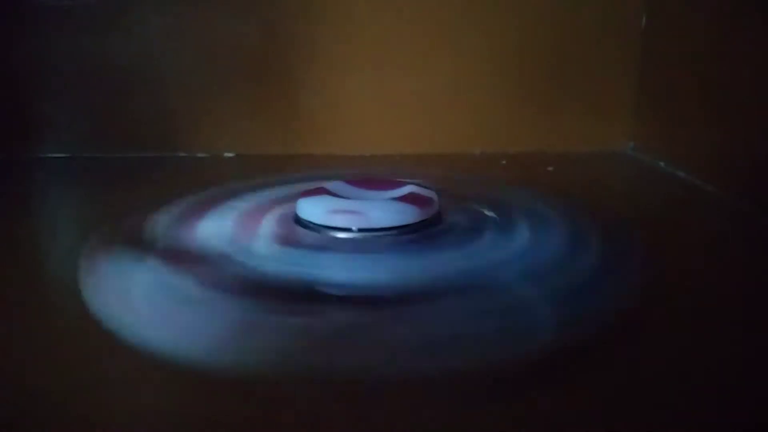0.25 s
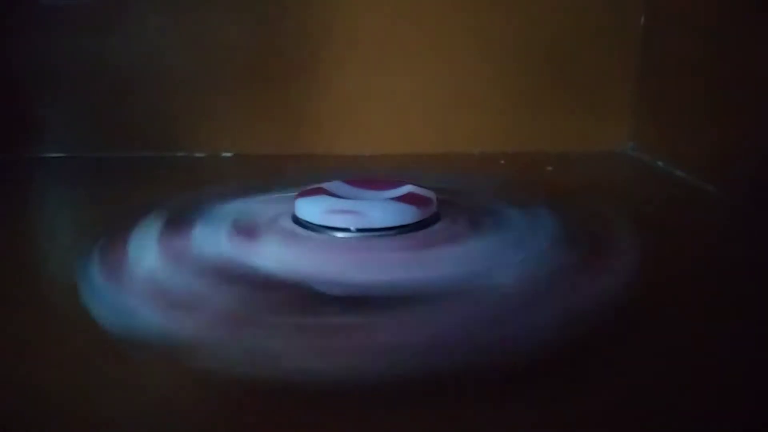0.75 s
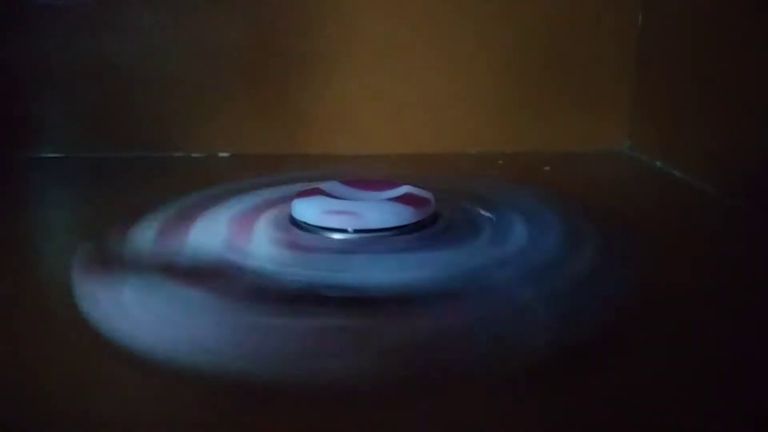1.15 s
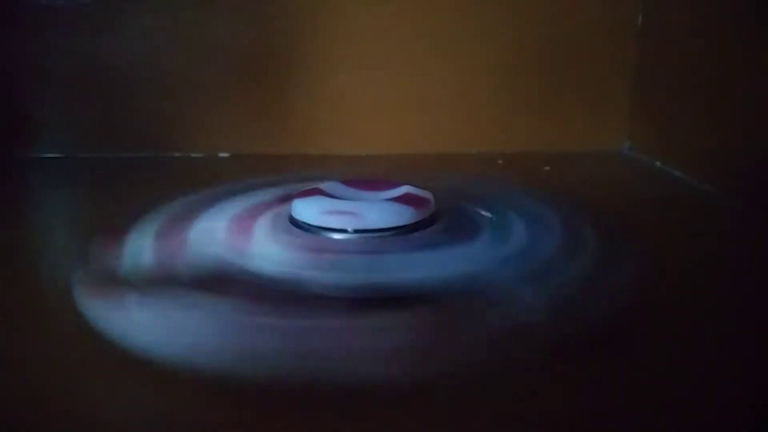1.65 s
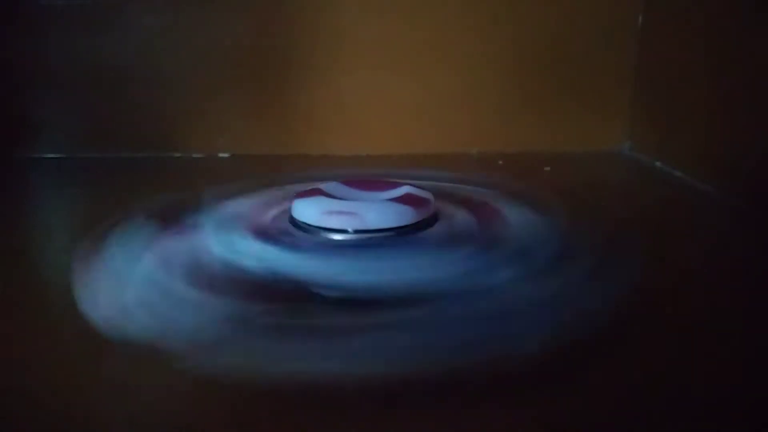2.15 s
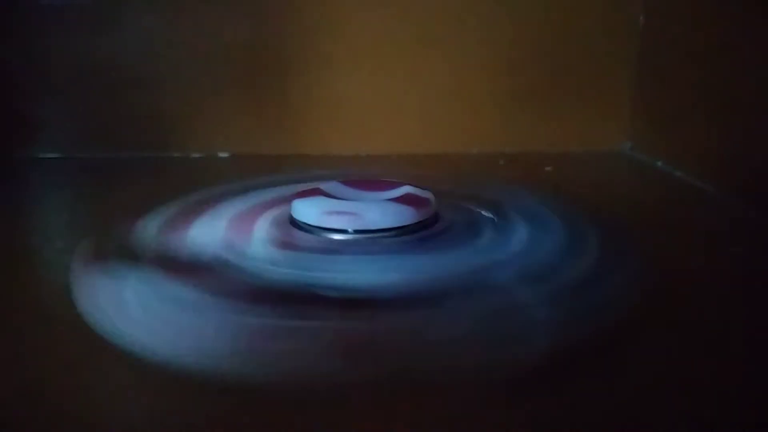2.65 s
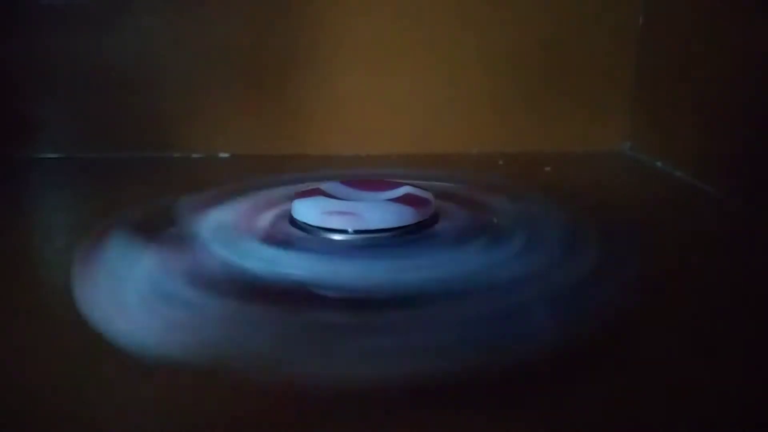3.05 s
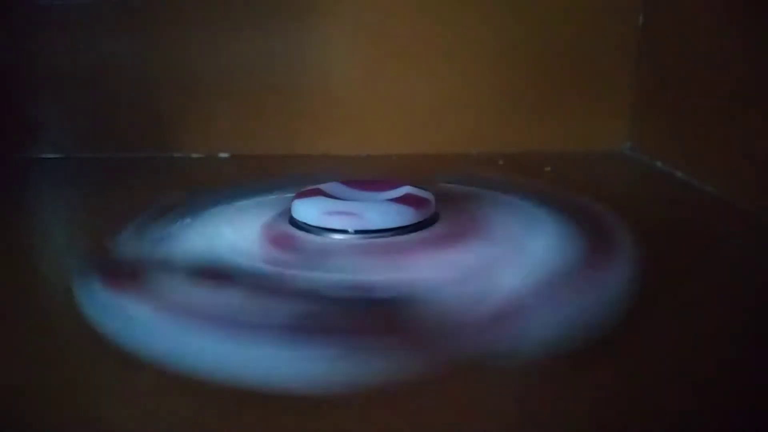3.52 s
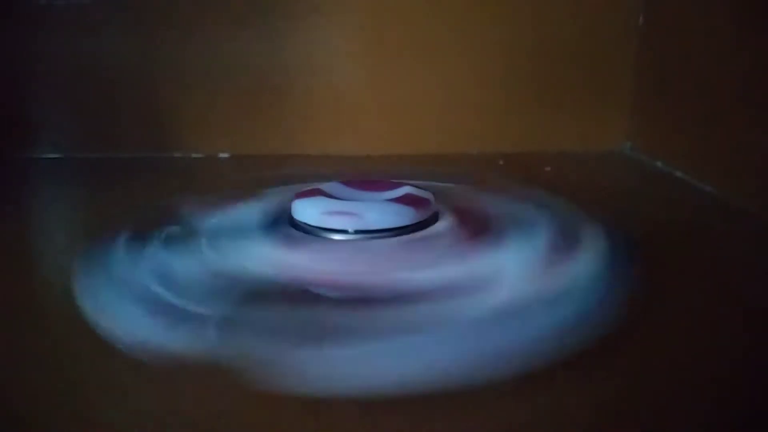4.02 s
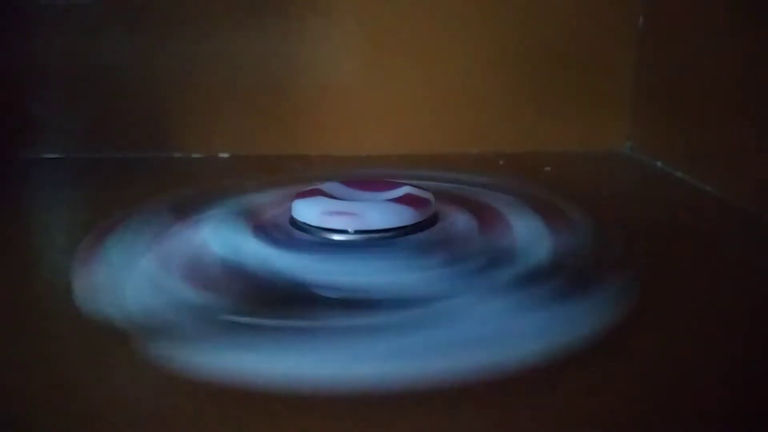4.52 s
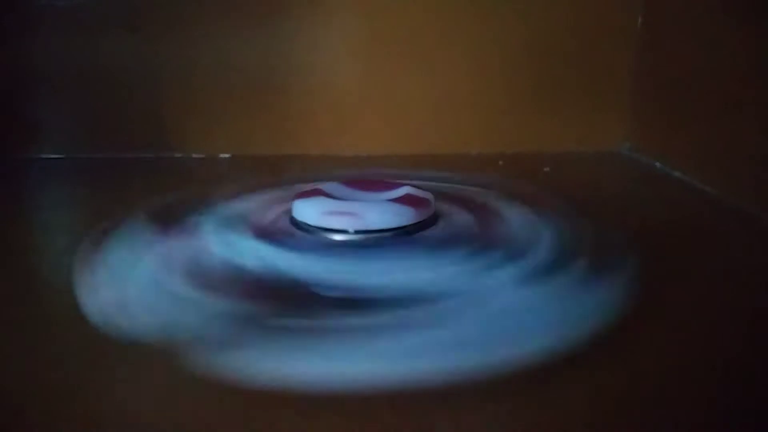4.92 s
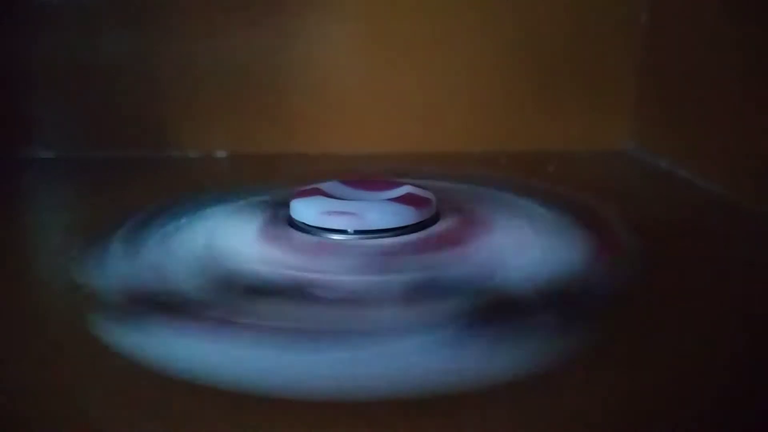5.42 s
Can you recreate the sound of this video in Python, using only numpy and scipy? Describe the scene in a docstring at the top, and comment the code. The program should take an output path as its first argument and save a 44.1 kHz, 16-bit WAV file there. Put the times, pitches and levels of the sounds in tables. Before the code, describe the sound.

A small spinner whirs steadily on its ball bearing on a hard board, with a rapid soft rattling flutter and a hissing metallic roll.

```python
"""A small spinner coasts on its ball bearing on a hard board, close to a dull microphone.
From the start, damped sines knock on the board, slowing from about 36 to 32 a second: some placed one by one,
the rest beating with slower cycles of cage and rotor. All the while the rolling balls hiss as flickering bands
of noise, over a low noise rumble, a buzz of sine harmonics and a faint wash of noise.
Past the middle, at 3.15 s, comes one faint tick: two bands of noise that die away."""
import sys
import numpy as np
from scipy import signal
from scipy.io import wavfile

SR = 44100
rng = np.random.default_rng(int(sys.argv[2]) if len(sys.argv) > 2 else 0)


def wav_out(sig):
    """Save sig, one row per channel (or a flat mono array), as 16-bit PCM at SR to the path in sys.argv[1]."""
    wavfile.write(sys.argv[1], SR, np.round(np.clip(np.atleast_2d(sig).T, -1, 1) * 32767).astype(np.int16))


N = 250047

# knocks on the board placed one by one, most of them hard: t/s, peak level/dB, ring f/Hz
PLACED_KNOCKS = [(0.029, -27.5, 341), (0.087, -29, 342), (0.112, -25, 315), (0.31, -22.5, 323),
                 (0.397, -29.5, 312), (0.536, -27, 321), (0.652, -28.5, 336), (0.734, -21.5, 327),
                 (0.934, -24.5, 356), (0.99, -22, 324), (1.105, -27.5, 312), (1.306, -24.5, 319),
                 (1.364, -21.5, 319.6), (1.623, -27, 369), (1.734, -25, 328), (1.793, -26.5, 327),
                 (1.942, -26, 316), (1.998, -23, 319), (2.116, -22, 326), (2.263, -26.5, 354),
                 (2.377, -24, 321), (2.436, -24.5, 370), (2.585, -22.5, 331), (2.643, -20, 331),
                 (2.82, -26.5, 323), (2.849, -22, 338), (2.941, -25.5, 312), (3.028, -23.5, 308),
                 (3.055, -22, 334), (3.089, -30, 355), (3.116, -28, 355), (3.145, -28, 334),
                 (3.235, -28, 330), (3.296, -22, 341), (3.474, -28, 326), (3.566, -25.5, 357),
                 (3.596, -25, 336), (3.685, -22, 318), (3.776, -23.5, 332), (3.897, -22, 329),
                 (3.953, -23, 336), (3.986, -27, 324), (4.136, -24.5, 323), (4.166, -23.5, 350),
                 (4.258, -28, 336), (4.291, -27.5, 326), (4.352, -22.5, 317), (4.411, -23.5, 329),
                 (4.563, -23.5, 336), (4.624, -24, 323), (4.84, -27, 337), (4.933, -20.5, 331),
                 (5.056, -20.5, 337), (5.151, -26, 345), (5.24, -24, 336), (5.304, -24, 345),
                 (5.648, -23, 333)]
KNOCKS_PER_S, SLOWING_PER_S2, FIRST_KNOCK_S = 35.7, .66, .0025  # rate at the first knock, and its loss


def from_db(db):
    """Decibels to gain."""
    return 10 ** (np.asarray(db) / 20)


def rms_one(x):
    """Scale to rms 1."""
    return x / np.sqrt(np.mean(x ** 2) + 1e-20)


def drift(rate_hz):
    """Slow random sway of rms 1: noise at every 40th sample through two equal one-pole low-passes."""
    pole = np.exp(-2 * np.pi * rate_hz * 40 / SR)
    noise = rng.standard_normal(N // 40 + 2002)
    slow = signal.lfilter([1], [1, -2 * pole, pole ** 2], noise)[2000:]  # drop the run-in
    return np.interp(np.arange(N) / 40, np.arange(len(slow)), rms_one(slow))


def band_noise(low_hz, high_hz, order):
    """White noise through a band-pass; equal density per Hz whatever the bandwidth."""
    sos = signal.butter(order, [low_hz, high_hz], "band", fs=SR, output="sos")
    return signal.sosfilt(sos, rng.standard_normal(N + 4000))[4000:]  # drop the run-in


def knocks():
    """Soft pushes: the board's ring swells for some ms, at a pitch set by how the hub lands, then dies."""
    # other board modes that ring along: f/Hz, level/dB against the main ring
    partner_modes = [(210, -17.5), (495, -12.5)]
    swell_s, t60_s, partner_scatter_db = .006, .066, 2.2
    t = np.arange(round(.12 * SR)) / SR
    envelope = (1 - np.exp(-(t / swell_s) ** 2)) * from_db(-60 * t / t60_s)
    out = np.zeros(N + len(t))
    for knock_s, peak_db, ring_hz in np.r_[PLACED_KNOCKS, regular_knocks()]:
        ring = np.sin(2 * np.pi * ring_hz * t)
        for mode_hz, mode_db in partner_modes:
            mode_gain = from_db(mode_db + partner_scatter_db * rng.standard_normal())
            ring = ring + mode_gain * np.sin(2 * np.pi * mode_hz * t)
        ring = envelope * ring
        start = max(round((knock_s - .004) * SR), 0)  # the swell begins 4 ms ahead
        out[start:start + len(t)] += from_db(peak_db) * ring / np.abs(ring).max()
    return out[:N]


def regular_knocks():
    """One knock a cycle wherever no placed one falls; strength from the bearing's beats plus chance."""
    # slower cycles of cage and rotor that swell the knocks: rate/(cycles per knock), phase/turns
    beat_cycles = [(.3165, .248), (.138, -.35), (.4557, -.1)]
    mean_db, beat_db, scatter_db, ceiling_db = -32.5, 3.5, 2, -28  # mean before the ceiling
    mean_hz, scatter_hz, jitter_s = 342.2, 15.7, .00195
    count = knock_count()
    k = np.arange(int(count[-1]) + 1)
    time_draw, level_draw, pitch_draw = rng.standard_normal((3, len(k)))
    knock_s = np.interp(k, count, np.arange(N) / SR) + jitter_s * time_draw
    beat = sum(np.cos(2 * np.pi * (cycles * k - turns)) for cycles, turns in beat_cycles)
    peak_db = np.minimum(mean_db + beat_db * beat + scatter_db * level_draw, ceiling_db)
    ring_hz = mean_hz + scatter_hz * pitch_draw
    # drop any within about half a cycle of a placed knock
    gap_s = np.abs(knock_s[:, None] - np.array(PLACED_KNOCKS)[:, 0]).min(axis=1)
    return np.c_[knock_s, peak_db, ring_hz][gap_s > .5 / KNOCKS_PER_S]


def knock_count():
    """Knock cycles passed so far, at a rate that sinks steadily as the spinner slows."""
    t = np.arange(N) / SR - FIRST_KNOCK_S
    return KNOCKS_PER_S * t - SLOWING_PER_S2 * t ** 2 / 2


def rolling():
    """The balls excite rotor, races and board; all groups shake together and throb at the knock rate."""
    # level curves of the rolling: t/s, race group level/dB, top group level/dB
    level_curves = [(0.0, -46.5, -54), (0.27, -45.5, -62.5), (0.41, -44, -54), (0.74, -44, -67),
                    (1.86, -46.5, -55.5), (2.51, -52.5, -68.5), (2.71, -50, -53), (3.89, -54.5, -60),
                    (5.62, -54.5, -60), (5.67, -49, -70)]
    # resonances of each group: f/Hz, width/Hz, level/dB within the group, flicker depth/dB before the flare
    rotor_bands = [(1935, 130, -4, 2), (2050, 90, -20, 3), (2330, 90, -18, 3), (2430, 90, -5, 2.5),
                   (2600, 90, -5, 2.5), (2850, 300, 0, 1.5), (3080, 120, -10, 4), (3440, 70, -21, 7),
                   (3660, 120, -21, 7), (3880, 150, -27, 7), (4100, 170, -32, 7)]
    race_bands = [(4610, 99, -21.5, 11.8), (4902, 151, 5.5, 2.28), (5120, 100, -7.5, 5.8),
                  (5228, 226, 5.5, 0.83), (5540, 210, -7.5, 2.1), (8100, 450, -40, 1.5)]
    top_bands = [(5620, 100, -7, 5), (5820, 150, -1, 6), (5990, 120, -2, 6), (6160, 180, 0, 5),
                 (6490, 130, -14, 7), (6770, 130, -10, 8), (7130, 90, -13, 8), (7530, 160, -27, 6),
                 (7990, 110, -29, 10), (8500, 140, -32, 11)]
    upper_board_bands = [(952.5, 105, 5, 1), (1079, 97, -1.5, 5), (1255, 115, -1.5, 3.5),
                         (1370, 100, -10.5, 9), (1510, 66, -24, 11), (1740, 70, -17, 10.5)]
    rotor_db, board_db, board_sway_db = -46, -53, 1.5
    shake_db, throb_db = 1.53, .8
    throb = np.cos(2 * np.pi * (knock_count() - .17))
    shake = shake_db * drift(41.0) + throb_db * throb
    curve_s, race_db, top_db = np.transpose(level_curves)
    t = np.arange(N) / SR
    race = from_db(np.interp(t, curve_s, race_db)) * resonances(race_bands, shake)
    top = from_db(np.interp(t, curve_s, top_db)) * resonances(top_bands, shake)
    board = from_db(board_db + board_sway_db * drift(6.8)) * resonances(upper_board_bands, shake)
    rotor = from_db(rotor_db) * resonances(rotor_bands, shake)
    return race + top + board + rotor


def resonances(bands, shake):
    """Noise in steep bands; each flares in short bursts of its own and follows the shake in dB; rms 1."""
    out = 0
    for hz, width_hz, db, flicker_db in bands:
        flare = 1.5 * np.tanh(2.2 * (drift(8.0) - .35))  # swings between dim and bright, dim more often
        noise = band_noise(hz - width_hz / 2, hz + width_hz / 2, order=3)
        out = out + from_db(db + flicker_db * flare + shake) * noise
    return rms_one(out)


def rumble():
    """Rolling felt through the board: quarter-octave bands of low noise, slightly patchy."""
    # spectrum of the board rumble: f/Hz, relative density level/dB per Hz
    rumble_spectrum = [(21, -46.5), (35, -31.5), (119, -13.5), (160, -14), (244, -15), (304, -22), (338, 1),
                       (444, -14.5), (502, -12.5), (695, -21), (807, -19.5), (900, -24), (1170, -54),
                       (1980, -120)]
    total_db, patchiness_db = -39.5, 1.7
    hz, db = np.transpose(rumble_spectrum)
    edges = 32 * 2 ** np.arange(0, 4.9, 1 / 4)  # 32 to 861 Hz
    out = 0
    for low, high in zip(edges, edges[1:]):
        level_db = np.interp(np.log(low * high) / 2, np.log(hz), db)  # at the band's log centre
        out = out + from_db(level_db + patchiness_db * drift(6.7)) * band_noise(low, high, order=3)
    return from_db(total_db) * rms_one(out)


def buzz():
    """Steady sine harmonics of one pitch, each wavering a little in level."""
    # harmonics of the buzz: multiple of the pitch, rms level/dB before the waver
    harmonics = [(1, -57), (2, -52.5), (4, -66), (5, -58), (14, -58.5), (15, -64.5), (18, -67.5), (20, -91),
                 (21, -69), (86, -71), (90, -72), (91, -65), (92, -60.5)]
    pitch_hz, waver_depth_db = 57.77, 1.5
    turn = 2 * np.pi * pitch_hz * np.arange(N) / SR
    out = 0
    for multiple, db in harmonics:
        gain = np.sqrt(2) * from_db(db + waver_depth_db * drift(6.0))  # rms to peak
        out = out + gain * np.sin(multiple * turn + rng.uniform(0, 2 * np.pi))
    return out


def tick():
    """A faint tick: a snap of noise with a weaker, higher rustle; both start at once and die away."""
    tick_s, t60_s, snap_db, rustle_db = 3.152, .08, -60, -76  # levels before the decay
    t = np.arange(N) / SR - tick_s
    decay = (t > 0) * from_db(-60 * np.maximum(t, 0) / t60_s)
    snap = from_db(snap_db) * rms_one(band_noise(3400, 7600, order=6))
    rustle = from_db(rustle_db) * rms_one(band_noise(9800, 11800, order=3))
    return decay * (snap + rustle)


def hiss():
    """A weak swaying wash between the resonances, a fainter treble wash, and flat microphone hiss."""
    wash_db, wash_sway_db, treble_db, microphone_db = -73, .59, -87, -79.5
    wash = from_db(wash_db + wash_sway_db * drift(17.0)) * rms_one(band_noise(1200, 6000, order=3))
    treble = from_db(treble_db) * rms_one(band_noise(5100, 7600, order=3))
    microphone = from_db(microphone_db) * rng.standard_normal(N)
    return wash + treble + microphone


def scene():
    """All sources, one channel."""
    return (knocks() + rolling() + rumble() + buzz() + tick() + hiss())[None]


def record(dry):
    """A steep elliptic low-pass cuts the top."""
    cutoff_hz, ripple_db, stop_db = 15700, .5, 50
    sos = signal.ellip(14, ripple_db, stop_db, cutoff_hz, fs=SR, output="sos")
    return signal.sosfilt(sos, dry)


dry = scene()
out = record(dry)
wav_out(out)
```